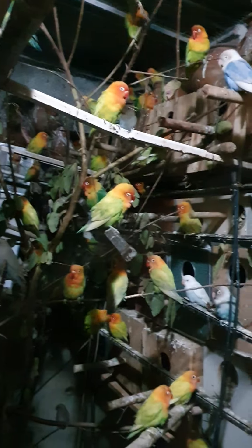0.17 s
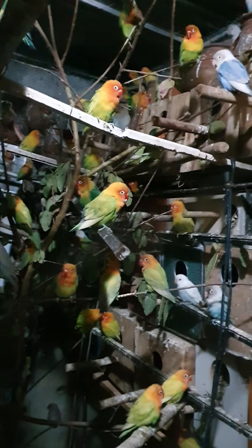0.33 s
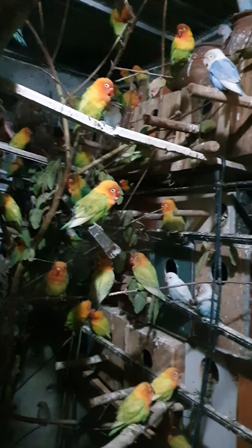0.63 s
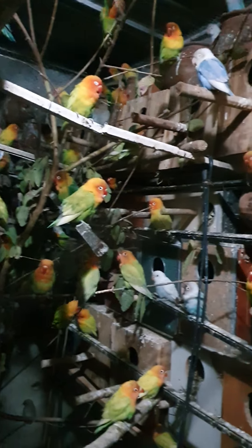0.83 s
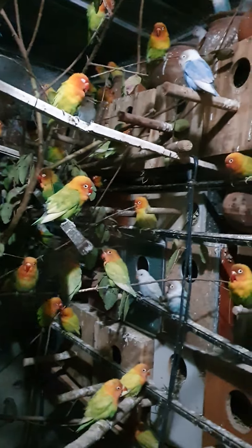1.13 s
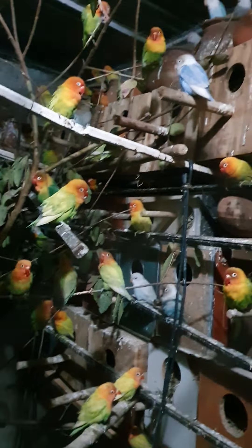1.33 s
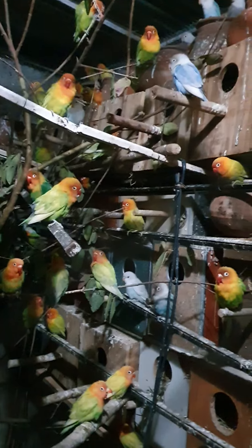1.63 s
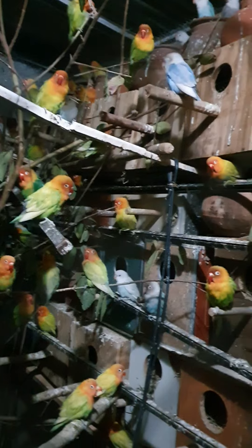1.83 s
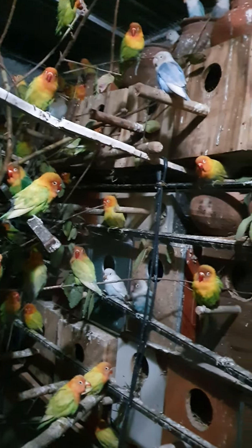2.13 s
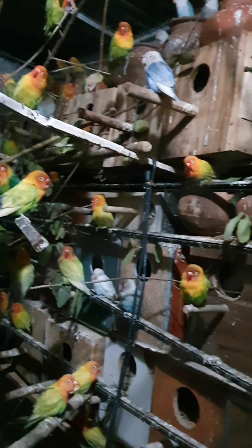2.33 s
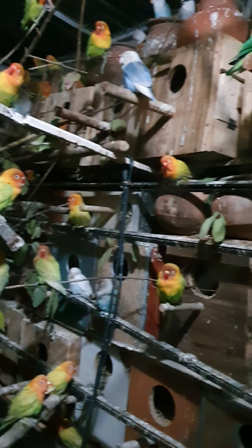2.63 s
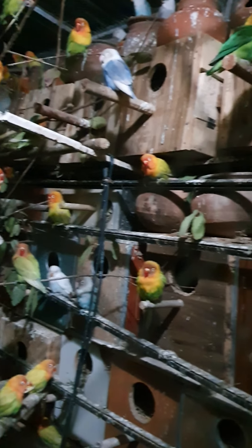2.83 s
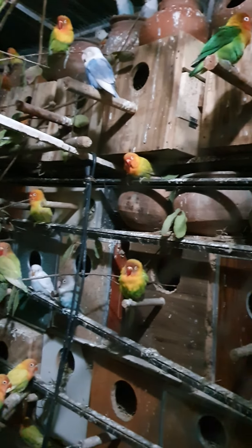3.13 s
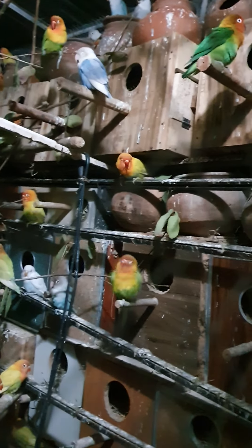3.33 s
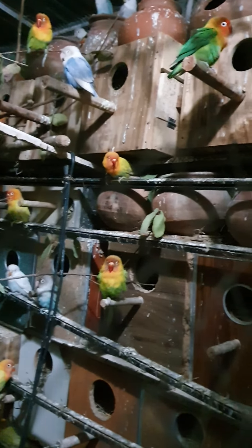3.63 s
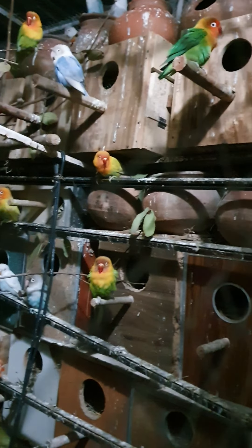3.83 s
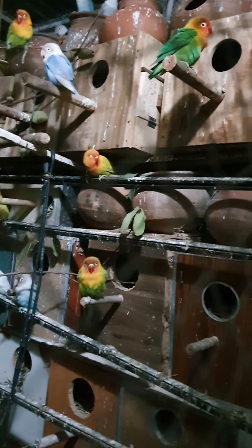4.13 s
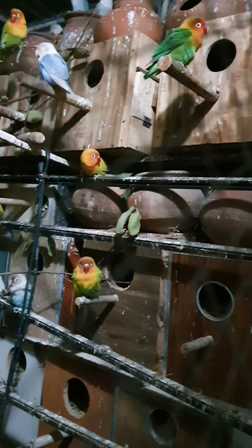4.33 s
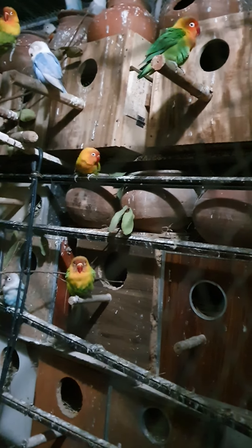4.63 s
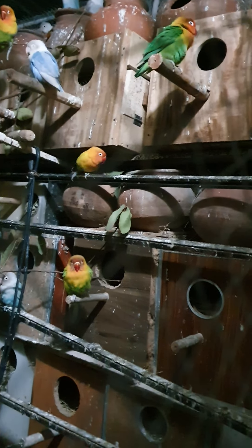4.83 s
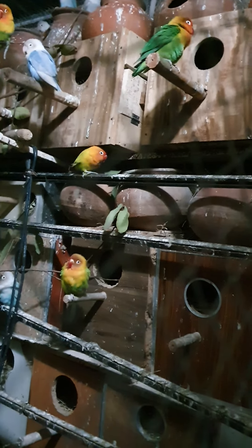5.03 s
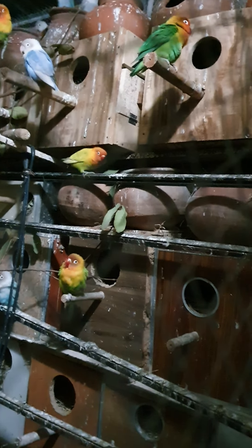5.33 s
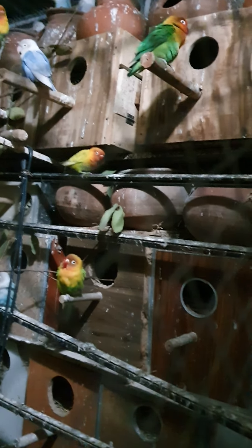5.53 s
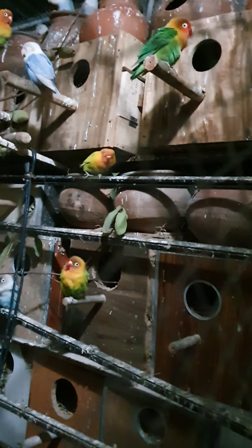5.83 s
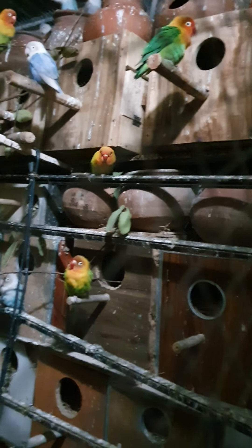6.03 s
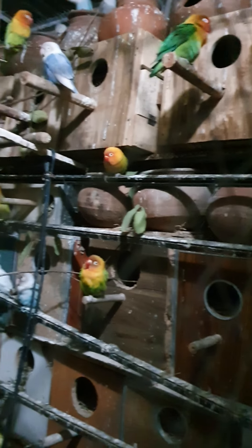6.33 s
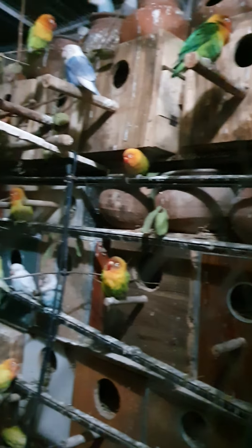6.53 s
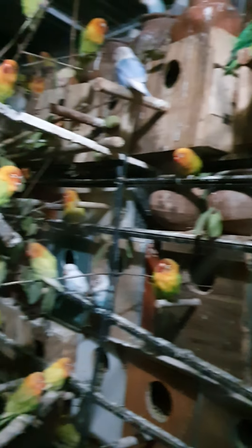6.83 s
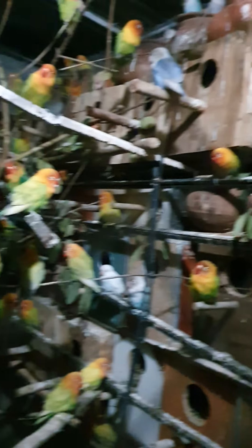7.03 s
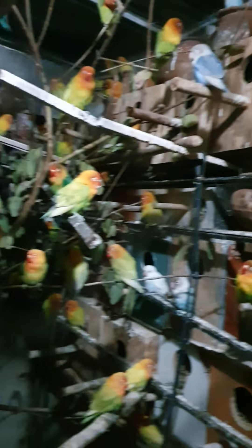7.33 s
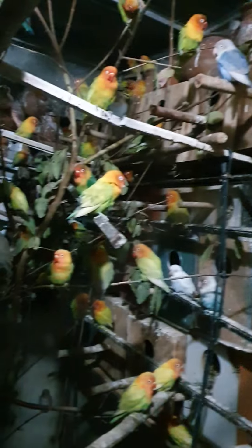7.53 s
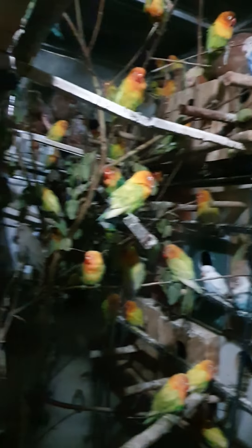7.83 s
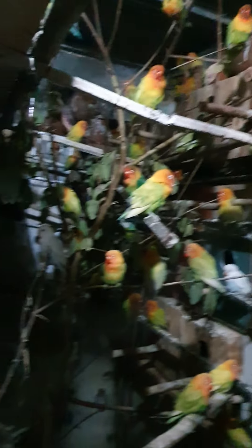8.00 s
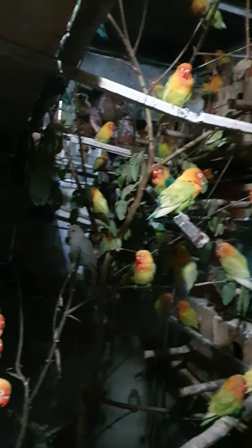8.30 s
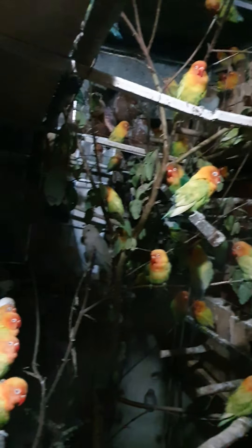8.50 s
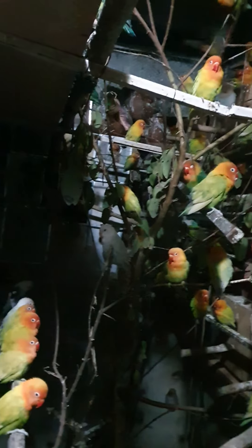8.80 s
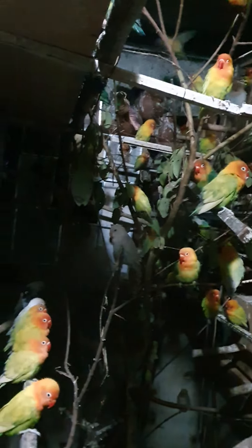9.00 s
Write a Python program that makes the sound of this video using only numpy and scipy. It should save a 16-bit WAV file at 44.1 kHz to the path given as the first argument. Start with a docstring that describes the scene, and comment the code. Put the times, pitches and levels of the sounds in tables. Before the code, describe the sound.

In a roofed aviary with wooden nest boxes, a low wavering hum and faint rumble run throughout. A small tick on wood comes at once, with distant twitter. A soft warble sounds at 0.7 s, a faint clear tone sets in near 0.9 and fades, and chirps gather around 1.1. From 1.3 to 2.5 s a near lovebird rattles off shrill staccato chips, loudest around 1.6, then about twelve a second, with short low notes between. It thins out: taps and a bright peep at 3.1-3.4, a quick warble at 4.1, chirps to 4.6, quiet around 5, then renewed far twitter at 5.6. A hoarse screech bursts out at 6.2, and three sharp calls follow from 6.6 to 6.8. Dull shuffling and a soft air rush fill 7-8 s with faint whistles, a soft bump lands at 8.8, and small chirps close at 9. Echoes are short.

```python
"""A low wavering hum and a tick on wood come first, then far twitter and the near lovebirds of a roofed aviary.
They warble, chirp and rattle off shrill staccato chips; later come a screech and three sharp calls.
Each voice is a gliding tone with overtones that turns hoarse when it is pushed. Box fronts and roof answer
briefly as copies and echo tails. Filtered noise makes the rumble, bumps, dull shuffling and soft rush beneath;
a faint clear tone sets in early and fades."""
import sys
import numpy as np
from scipy import signal
from scipy.fft import rfft, irfft, next_fast_len
from scipy.io import wavfile
from scipy.ndimage import map_coordinates

SR = 44100
rng = np.random.default_rng(int(sys.argv[2]) if len(sys.argv) > 2 else 0)


def master(y):
    """Save y as 16-bit WAV."""
    cut = np.clip(np.atleast_2d(y).T, -1, 1)
    pcm = np.round(cut * 32767)  # scale
    wavfile.write(sys.argv[1], SR, pcm.astype(np.int16))


N = 403956

# strength of the rumble over time, before its gain: (time_s, level_db)
RUMBLE_LEVEL = [(0.0, -61.5), (1.12, -57), (3.75, -62), (5.15, -60), (6.38, -58.5), (6.89, -53.5),
                (7.14, -57), (9.16, -57.5)]


def amp(db):
    """Decibels to gain."""
    return 10 ** (np.asarray(db) / 20)


def unit(x):
    """Scale to rms 1."""
    return x / np.sqrt(np.mean(x ** 2) + 1e-20)


def along(points, hz):
    """Read a curve of (frequency, value) points on a log frequency axis."""
    f, v = np.transpose(points)
    return np.interp(np.log(hz + 1), np.log(f + 1), v)


def curves(rows, t=None):
    """One value per sample for each column after the time."""
    if t is None:
        t = np.arange(N) / SR
    s, *cols = np.transpose(rows)
    return [np.interp(t, s, c) for c in cols]


def swells(rows, order=2):
    """Gain of rounded swells, each (middle_s, length_s, level_db); a higher order gives flatter tops."""
    t = np.arange(N) / SR
    return sum(amp(db) * np.exp(-np.abs(2 * (t - s) / length) ** order) for s, length, db in rows)


def wobble(rate, size):
    """A smooth random curve through `rate` random points a second."""
    points = rng.standard_normal(int(size * rate / SR) + 4)
    return map_coordinates(points, [np.arange(size) * rate / SR])


def filtered(x, response):
    """Multiply the spectrum of x by a response that depends on frequency."""
    m = next_fast_len(N + SR // 2)
    return irfft(rfft(x, m) * response(np.fft.rfftfreq(m, 1 / SR)), m)[..., :N]


def bandpass(x, edges_hz, order):
    """Keep the part of x between two frequencies."""
    return signal.sosfilt(signal.butter(order, edges_hz, 'band', fs=SR, output='sos'), x)


def noise(colour):
    """Coloured stereo noise of rms 1; a shared and an opposed part set how alike the sides are."""
    # likeness of left and right, 1 = same: (frequency_hz, likeness)
    likeness = [(60, 0.56), (150, 0.11), (300, 0.67), (600, -0.2), (1200, -0.037), (4000, -0.02)]

    def response(hz):
        turn = np.arccos(np.clip(along(likeness, hz), -1, 1)) / 2
        return amp(along(colour, hz)) * [np.cos(turn), np.sin(turn)]

    mid, side = filtered(rng.standard_normal((2, N)), response)
    return unit(np.array([mid + side, mid - side]))


def tone(hz, waver):
    """A sine of rms 1 whose pitch wavers at random."""
    return np.sqrt(2) * np.sin(2 * np.pi * np.cumsum(hz * (1 + waver * wobble(10, N))) / SR)


def add(track, s, sound):
    """Mix a stereo sound into the track at time s."""
    part = track[:, max(round(s * SR), 0):][:, :sound.shape[1]]
    part += sound[:, :part.shape[1]]


def tail(decay):
    """A stereo echo tail of noise in which each frequency dies at its own speed."""
    hz, t, z = signal.stft(rng.standard_normal((2, SR // 3)), SR, nperseg=256)
    t60 = np.maximum(along(decay, hz), .01)[:, None]
    echo = signal.istft(z * amp(-60 * t / t60), SR, nperseg=256)[1]
    return echo / np.linalg.norm(echo[0])


def placed(sound, pan_db, boxes_db, roof_db, gap=.002, walls_db=-9, reach=.016, count=5):
    """A sound from a perch: the direct path, copies off box fronts, their scatter and the roof."""
    # time for an echo to fall 60 dB, off the boxes and off the roof: (frequency_hz, decay_s)
    box_decay = [(1500, 0.18), (5000, 0.074), (10000, 0.079), (15000, 0.045)]
    roof_decay = [(1500, .36), (5000, .27), (10000, .2), (15000, .12)]
    echoes = amp(boxes_db) * tail(box_decay) + amp(roof_db) * tail(roof_decay)
    paths = np.pad(echoes, ((0, 0), (int(gap * SR) + 4, 0)))
    # the direct sound reaches the left side three samples earlier
    paths[[0, 1], [0, 3]] += 1
    # flat box fronts return distinct copies, so one glide is heard as several strands
    delay = gap + reach * rng.random((2, count))  # seconds
    paths[[[0], [1]], (delay * SR).astype(int)] += amp(walls_db) * np.exp(-delay / reach)
    heard = signal.fftconvolve(sound[None], paths, axes=1)
    # echoes leave the energy of each side unchanged; panning comes last, positive to the left
    heard *= np.linalg.norm(sound) / np.linalg.norm(heard, axis=1, keepdims=True)
    return unit(amp([[pan_db / 2], [-pan_db / 2]])) * heard


def syrinx(hz, treble_db, rough, jitter=0.1, flutter_db=5, doubling=0.794, rasp_rad=0.78, tilt=1.8,
           split_hz=7300):
    """A tone with overtones; roughness shakes pitch and level, doubles the period and adds rasp."""
    # how throat and open beak colour the overtones: (frequency_hz, gain_db)
    beak_colour = [(900, 25), (1500, 1), (1900, -9), (2600, 1), (3500, -4), (4600, 13.5), (5800, 8.5),
                   (7500, -7), (9500, -0.5), (11000, -4.5), (13000, -1.5), (15500, -12)]
    size = len(hz)
    rough = np.clip(rough, 0, 1)
    phase = 2 * np.pi * np.cumsum(hz * (1 + jitter * rough * wobble(650, size))) / SR
    k = np.arange(2, 19)[:, None] / 2  # multiples of the pitch: 1, 1.5, 2 ... 9
    partial_hz = k * hz
    # lines halfway between the harmonics grow as the voice is pushed
    weight = np.where(k % 1, doubling * rough ** 1.9, 1) * k ** -tilt
    weight = weight * amp(along(beak_colour, partial_hz)) * (partial_hz < SR / 2.5)

    def share(w):
        return w / np.sqrt(np.sum(w ** 2, axis=0) + 1e-12)

    # set the treble level against the rest
    high = (1 + np.tanh((partial_hz - split_hz) / 400)) / 2
    weight = share(weight * (1 - high)) + amp(treble_db) * share(weight * high)
    rasp = rasp_rad * rough ** 2 * wobble(3200, size)
    voice = np.sqrt(2) * np.sum(weight * np.sin(k * (phase + rasp)), axis=0)
    return voice * unit(amp(flutter_db * rough * wobble(600, size)))


def radiated(note, pitch_hz, top_hz, below=0.71, order=3):
    """The beak sheds nothing far below the lowest pitch given, and little of the highest treble."""
    return bandpass(note, [below * np.min(pitch_hz), top_hz], order)


def gate(t, length, attack, release):
    """Opens at zero and closes around the end of a note; all times in seconds."""
    opening = np.sin(np.pi / 2 * np.clip(t / attack, 0, 1))
    closing = np.sin(np.pi / 2 * np.clip((length - t) / release + .5, 0, 1)) ** 2
    return opening * closing


def hum(hum_hz=75, line_db=-2.0, noise_db=2):
    """A low hum: a wavering sine in a band of deep noise, rising and falling together."""
    # level before the two gains: (time_s, level_db)
    hum_level = [(0.0, -51.5), (1.45, -48), (2.04, -55), (2.45, -45), (3.06, -52.5), (3.72, -53),
                 (5.05, -50), (5.31, -53.5), (6.3, -51.5), (6.94, -48), (7.3, -53), (8.04, -46),
                 (8.16, -54), (8.47, -50.5), (8.75, -51), (9.16, -50)]
    # (frequency_hz, gain_db)
    hum_colour = [(13, -38), (22, -21.5), (54, 1), (70, -0.5), (86, 2.5), (140, -22), (180, -45.5),
                  (310, -120)]
    parts = amp(noise_db) * noise(hum_colour) + amp(line_db) * tone(hum_hz, .045)
    return amp(curves(hum_level)[0]) * parts


def rumble(gain_db=4):
    """Low noise that swells and sinks slowly."""
    # (frequency_hz, gain_db)
    rumble_colour = [(65, -36), (110, -3), (178, -5), (274, -13.5), (306, -14.5), (404, -20.5), (480, -19),
                     (620, -48), (1060, -120)]
    return amp(curves(RUMBLE_LEVEL)[0]) * amp(gain_db) * noise(rumble_colour)


def bumps(gain_db=1):
    """Soft low bumps: short swells of deep noise."""
    # level before the gain: (middle_s, length_s, level_db)
    bump_list = [(.28, 0.071, -48), (.95, 0.085, -46), (2.47, 0.15, -48), (6.36, 0.071, -48.5),
                 (6.92, 0.151, -42.5), (7.99, 0.2, -51.5), (8.77, 0.14, -37), (8.83, 0.034, -29.5)]
    # (frequency_hz, gain_db)
    bump_colour = [(15, -32.5), (45, -5.5), (75, -0.5), (120, -5.5), (170, -7), (260, -23), (450, -35.5),
                   (900, -81.5)]
    return swells(bump_list) * amp(gain_db) * noise(bump_colour)


def air_rush(gain_db=2):
    """A soft rush of air: coloured noise of changing strength."""
    # level before the gain: (time_s, level_db)
    rush_level = [(0.0, -79), (1.33, -61.5), (1.73, -67), (2.37, -64.5), (2.93, -76), (3.21, -73),
                  (3.44, -57.5), (3.7, -69.5), (4.82, -70), (5.18, -61), (5.41, -60), (6.25, -69),
                  (6.4, -58.5), (6.71, -65.5), (7.5, -54), (8.47, -61), (8.9, -59), (9.16, -57)]
    # (frequency_hz, gain_db)
    rush_colour = [(800, -13), (1200, -6), (1550, 0.5), (2000, 2.5), (2500, -10.5), (3500, -37),
                   (6000, -36)]
    return amp(curves(rush_level)[0]) * amp(gain_db) * noise(rush_colour)


def shuffling(gain_db=2.5, stir_db=-6):
    """Dull scuffs of unsteady noise, over a faint stir that follows the rumble."""
    # level before the gain: (middle_s, length_s, level_db)
    scuff_list = [(.3, 0.146, -65), (.73, 0.13, -59), (1.22, 0.18, -59), (5.1, 0.227, -64),
                  (5.76, .1, -60.5), (6.03, 0.089, -60), (6.38, 0.17, -59.5), (6.99, 0.2, -45.5),
                  (7.27, 0.055, -57.5), (7.43, .12, -49), (7.65, .08, -55.5), (7.77, .12, -51.5),
                  (7.92, .12, -48), (8.06, 0.0775, -51.5), (8.62, 0.081, -57), (8.82, 0.153, -53.5)]
    # (frequency_hz, gain_db)
    shuffle_colour = [(250, -32), (430, -9.5), (550, -0.5), (660, -0.5), (950, -6.5), (1300, -12.5),
                      (1700, -14.5), (2600, -39.5)]
    stir = amp(stir_db) * amp(curves(RUMBLE_LEVEL)[0])
    level = np.hypot(amp(gain_db) * swells(scuff_list), stir)
    return level * amp(2.3 * wobble(60, N)) * noise(shuffle_colour)


def background():
    """The low sounds lean to the right; the shuffling and the rush lean to the left."""
    low = hum() + rumble() + bumps()
    return low * amp([[-2.3], [1.7]]) + (shuffling() + air_rush()) * amp([[1], [-1]])


def drone(drone_hz=305, start_s=.87, attack_s=0.034, level_db=-58, fade_db_per_s=6):
    """A faint clear tone that sets in and fades by a steady number of decibels a second."""
    age = np.maximum(np.arange(N) / SR - start_s, 0)
    return np.minimum(age / attack_s, 1) * amp(level_db - fade_db_per_s * age) * tone(drone_hz, 0.006)


def taps(click_db=-9, knock_db=-7, click_t60=0.01, knock_t60=0.013):
    """Claws and beaks on wood: each a dry noise tick with a small, duller knock."""
    # both gains come on top; knock_level_db is relative to the tap: (start_s, level_db, knock_level_db)
    tap_list = [(0.055, -41.5, -21), (3.14, -41, -15), (3.339, -30.5, -33), (4.175, -31, -11),
                (4.638, -44, 2), (6.884, -44, 9), (7.207, -36, -30), (7.957, -50, 14.5)]
    track, t = np.zeros((2, N)), np.arange(SR // 20) / SR

    def burst(band_hz):
        return unit(bandpass(rng.standard_normal(len(t)), band_hz, 2))

    for s, db, wood_db in tap_list:
        tick = amp(click_db) * burst([2000, 9000]) * amp(-60 * t / click_t60)
        knock = amp(knock_db + wood_db) * burst([400, 1600]) * amp(-60 * t / knock_t60)
        add(track, s, placed(amp(db) * (tick + knock), 0, boxes_db=-29, roof_db=-14.0))
    return track


def flock(twitter_db=-2.0, hiss_db=-9.0, quiet_db=-86, lull_db=-78):
    """Far birds: one echoing, wandering voice blurs into bouts of faint twitter over a fine hiss."""
    # bouts at the back of the aviary, level before the gains: (middle_s, length_s, level_db)
    bout_list = [(.22, 0.42, -68), (.92, 0.58, -61.5), (1.85, 1.5, -58), (2.68, .14, -65),
                 (3.33, 0.29, -58.5), (5.15, 0.31, -73.5), (5.64, .32, -53), (6.4, 0.21, -52.5),
                 (6.72, 0.56, -62), (7.31, 0.54, -56), (7.75, 0.323, -67), (8.3, 0.35, -60.5),
                 (8.76, 0.22, -64), (9.04, .17, -53.5)]
    # (frequency_hz, gain_db)
    hiss_colour = [(1500, -25), (2600, -1), (3800, -4), (5500, -16.5), (7200, -21.5), (9500, -13.5),
                   (12500, -15.5), (16000, -30)]
    voice = syrinx(3550 * np.exp(.15 * wobble(70, N)), treble_db=-12, rough=.4)
    voice = voice * amp(5.5 * wobble(34, N))
    twitter = unit(placed(voice, 0, boxes_db=8.5, roof_db=-4)[:, :N])
    level = amp(lull_db) + swells(bout_list, order=6)
    hiss = (level * amp(hiss_db) + amp(quiet_db)) * noise(hiss_colour)
    return level * amp(twitter_db) * twitter + hiss


def sharp_call(s, length, top_hz, db):
    """A sharp call climbs hoarsely to a clear top; all share this shape."""
    # (share_of_length, pitch_ratio, level_db, treble_db, roughness_0_to_1)
    sharp_shape = [(0, .56, -11, -6, 0.6), (.27, .72, -7.5, -1, .42), (0.469, .82, -9, -5.5, 1),
                   (.64, 1, 2.5, -12, .25), (1, 0.95, -16, -0.5, 0.2)]
    return [(s + share * length, ratio * top_hz, db + level_db, treble_db, rough)
            for share, ratio, level_db, treble_db, rough in sharp_shape]


def phrases(gain_db=1.0):
    """Longer calls: pitch, level, treble and roughness wind from point to point."""
    # points along each call, level before the gain: (time_s, pitch_hz, level_db, treble_db, roughness_0_to_1)
    soft_warble = [(0.73, 3080, -46, -10, 0.56), (0.752, 4800, -61, 2, 0.1),
                   (0.766, 2620, -36.5, -15, 0.02), (0.785, 2450, -43, -11, 0.07),
                   (0.797, 4750, -51, -16, 0.46), (0.826, 3900, -51.5, 1.5, 0),
                   (0.836, 2365, -37.5, -41, 0.1), (0.86, 2820, -68.5, -7, 0.54),
                   (0.885, 2420, -40, -16, 0.4)]
    warble = [(4.07, 4263, -31, -17, .25), (4.077, 5194, -43.5, -17, 0.493), (4.083, 2584, -45, -13, 0.95),
              (4.104, 3066, -38, -11.5, 0.37), (4.113, 5634, -38, -26, 0.09),
              (4.134, 6000, -55, -22, 0.046), (4.141, 3850, -46, -15, 0.088),
              (4.156, 2434, -44.5, -12, .12), (4.174, 3550, -44, -20, 0.14), (4.182, 5300, -50, -33, .08),
              (4.196, 4926, -35.5, -18, .06), (4.214, 5398, -36.5, -17, 0.049)]
    screech = [(6.219, 3290, -33, -7, 0.6), (6.227, 5500, -27.5, -5.5, 0.4), (6.24, 6434, -28.5, -19, 0.45),
               (6.257, 6306, -32.5, 0, 0.23), (6.267, 3100, -20, -12, 0.38),
               (6.277, 2979, -26, -13.5, 0.062), (6.286, 4280, -18.5, -10.5, 0.3),
               (6.315, 4555, -24.5, -18.5, 0.28), (6.33, 4744, -27.5, -6.5, 1),
               (6.345, 4446, -24, -26, 0.38)]
    peep = [(3.353, 4506, -36, -9, 0.27), (3.358, 5289, -27.5, -10.5, 0.25), (3.363, 5880, -25, -21, 0.125),
            (3.37, 5599, -36, -1, 0.058), (3.382, 5504, -34, -4, 0.054)]
    falling_whistle = [(7.295, 3750, -54, -6, .2), (7.345, 3450, -50, -9, .08), (7.36, 2100, -49, -18, .06),
                       (7.385, 1500, -50, -22, .05), (7.41, 1405, -46, -25, .04),
                       (7.47, 1390, -50, -16, .06)]
    rising_whistle = [(8.334, 2750, -55.5, -2.5, .4), (8.35, 2480, -53.5, 1.5, 0.35),
                      (8.365, 3145, -41, -10, 0.26), (8.39, 3790, -57.5, 1.5, 0.3),
                      (8.415, 4740, -48, -3, .3)]
    # level before the shape and the gain: (start_s, length_s, top_hz, level_db, left_over_right_db)
    sharp_list = [(6.578, .033, 4680, -28.5, -0.3), (6.694, .04, 4670, -23, -0.5),
                  (6.805, .041, 4890, -21, 0)]
    # each call with its left over right in dB
    calls = [(soft_warble, 3.8), (warble, -1.7), (screech, -0.5), (peep, 0.9),
             (falling_whistle, -1.3), (rising_whistle, 6.9)]
    calls += [(sharp_call(*call), pan_db) for *call, pan_db in sharp_list]
    track = np.zeros((2, N))
    for rows, pan_db in calls:
        start, length = rows[0][0], rows[-1][0] - rows[0][0]
        t = np.arange(int((length + .004) * SR)) / SR
        hz, db, treble_db, rough = curves(rows, start + t)
        note = amp(db + gain_db) * syrinx(hz, treble_db, rough)
        note = note * gate(t, length, attack=0.00256, release=0.0073)
        note = radiated(note, hz, top_hz=13504)
        add(track, start, placed(note, pan_db, boxes_db=-0.5, roof_db=-22.5))
    return track


def chirps(gain_db=1.13):
    """Short notes whose pitch rises, arches or falls in the shape of their kind."""
    # pitch is that of the middle, level before the gain:
    # (start_s, length_s, pitch_hz, level_db, treble_db, left_over_right_db)
    rising = [(1.054, .047, 4471, -35.5, -6.5, 0.5), (1.168, 0.028, 4270, -33, -12.5, 6),
              (4.348, .024, 3950, -49, -3, 4.5), (4.453, .031, 3540, -39, -11.5, 3),
              (4.576, .025, 4405, -29.5, -7.5, 1), (5.517, 0.044, 2950, -50, -7, 9),
              (7.127, 0.014, 5650, -42, -16.5, 0), (8.996, .045, 4400, -45.5, -13, 7)]
    low_falling = [(1.697, 0.013, 1797, -43.5, 0.5, 4.5), (1.797, 0.016, 1935, -35, -1.5, 8.5),
                   (1.994, 0.011, 1700, -49.5, -3, 9), (2.088, 0.0098, 1716, -46, -15, 2),
                   (2.163, 0.014, 1890, -40.5, -19, 10), (5.787, .016, 1780, -38.5, -8, 0),
                   (5.863, 0.0097, 1743, -34.5, -4.5, 1), (5.937, 0.01, 1750, -34.5, -3, 1)]
    arched = [(.893, 0.021, 4250, -52.5, -12, 2.5), (.928, 0.056, 2873, -43.5, -10.5, 6),
              (1.072, 0.027, 3255, -42, -8, 5), (3.183, 0.071, 3870, -52.5, -17, 6),
              (4.469, 0.011, 5000, -40, -16, -2), (5.015, 0.0211, 4535, -65, -10.5, 1),
              (5.207, 0.02, 4650, -60.5, -10, -5), (5.483, 0.0363, 2280, -48, -10, 5),
              (5.59, 0.044, 2410, -42, -6.5, 1.5), (6.392, 0.039, 3840, -43, -14, 2),
              (6.473, .04, 4565, -45, -10, 1), (8.049, 0.027, 4603, -39.5, -1, 4),
              (8.138, 0.021, 4500, -44, -1, 2)]
    hoarse = [(1.184, 0.011, 4193, -26, -4.5, 1), (2.062, .004, 2610, -33, -11.5, 3),
              (2.384, 0.00834, 2406, -40, -8.5, 3), (3.689, .034, 2987, -45.5, -3, 2),
              (4.453, 0.018, 3013, -46.5, -7, -3), (6.369, 0.011, 3580, -35, -11, 1),
              (7.201, .04, 3920, -56, -9, 3), (7.497, .019, 4980, -56, -0.5, .5)]
    clear_sagging = [(1.112, 0.029, 4000, -46.5, -21, -9), (2.445, 0.037, 4443, -35, -5.5, 1),
                     (3.395, 0.056, 3460, -50, -34, 5), (5.647, 0.0336, 3530, -42, -32, 2),
                     (7.14, 0.083, 3704, -51.5, -19, 3), (7.592, .024, 2786, -56.5, -11, 4),
                     (9.074, .04, 3780, -49, -19, 3)]
    # (notes, start pitch ratio, end pitch ratio, roughness 0 to 1)
    kinds = [(rising, .82, 1.07, .42), (low_falling, 1.13, .87, .3), (arched, .95, .93, .38),
             (hoarse, .9, .94, .82), (clear_sagging, 1.035, .97, .12)]
    track = np.zeros((2, N))
    for notes, start, end, rough in kinds:
        shape = np.polyfit([0, .5, 1], [start, 1, end], 2)
        for s, length, pitch_hz, db, treble_db, pan_db in notes:
            t = np.arange(int((length + 0.0035) * SR)) / SR
            hz = pitch_hz * np.polyval(shape, t / t[-1])
            voice = syrinx(hz * (1 + 0.014 * wobble(150, len(t))), treble_db, rough)
            note = amp(db + gain_db) * voice * gate(t, length, attack=0.0041, release=0.0021)
            note = radiated(note, hz, top_hz=13500)
            # faint birds sit farther away, so more of their sound is echo
            far_db = -.3 * (db + 40)
            add(track, s, placed(note, pan_db, boxes_db=far_db - 3.5, roof_db=far_db - 20))
    return track


def chips(scoop_s=0.0026, gain_db=1.5, swell_db=4):
    """Staccato chips: each snaps open and glides, mostly upward, to its top pitch in milliseconds."""
    # level before gain and swell: (start_s, length_s, start_hz, top_hz, level_db, left_over_right_db)
    chip_list = [(1.268, 0.0094, 6230, 5080, -24, 3.5), (1.345, 0.0069, 6020, 5240, -22, 9.5),
                 (1.358, .007, 3250, 4730, -34, 3.5), (1.42, .0025, 3202, 4270, -24, 6.5),
                 (1.433, 0.0098, 4430, 5150, -31.5, 1.5), (1.483, 0.0032, 3207, 4375, -24.5, 4),
                 (1.514, 0.0073, 4198, 4935, -37, -2.5), (1.547, .004, 5220, 5704, -15.5, 7),
                 (1.617, .004, 5390, 5390, -12.5, 6.5), (1.69, 0.0041, 4840, 5450, -15, -2.5),
                 (1.771, 0.0074, 3730, 5180, -27.5, 0.5), (1.847, .008, 3890, 5020, -21, .5),
                 (1.926, 0.0075, 3660, 5020, -22, 5), (2.007, .006, 3590, 5020, -22, 5),
                 (2.087, 0.0057, 3600, 4880, -21, 9), (2.167, 0.0079, 3410, 4800, -19.5, 5),
                 (2.253, 0.0059, 3510, 4800, -16, 5), (2.333, 0.0077, 3370, 5060, -19.5, 4.5),
                 (2.418, 0.0068, 3330, 4950, -20, 3.5), (2.504, 0.0049, 3290, 4810, -19, 3.5)]
    track = np.zeros((2, N))
    for s, length, start_hz, top_hz, db, pan_db in chip_list:
        t = np.arange(int((length + 0.0048) * SR)) / SR
        unsettled = np.exp(-t / scoop_s)
        hz = top_hz + (start_hz - top_hz) * unsettled
        # a deeper upward scoop is brighter; a wider glide either way is hoarser, most of all at its start
        octaves = np.log2(top_hz / start_hz)
        treble_db = -9.5 + 13 * max(octaves, 0) - 4 * unsettled
        rough = (0.12 + 0.39 * abs(octaves)) * (0.74 + 2.3 * unsettled)
        swell = swell_db * (np.sin(np.pi * np.clip(t / length, 0, 1)) - .5)
        note = amp(db + gain_db + swell) * syrinx(hz, treble_db, rough)
        note = note * gate(t, length, attack=.0006, release=.003)
        note = radiated(note, start_hz, top_hz=16500)
        add(track, s, placed(note, pan_db, boxes_db=-8.0, roof_db=-28.5))
    return track


def scene():
    """The aviary, the far birds and the near birds together."""
    return background() + drone() + taps() + flock() + phrases() + chirps() + chips()


def record(dry, limit_hz=16100):
    """The microphone dulls the deepest bass and top treble; nothing above the limit is kept."""
    # (frequency_hz, gain_db)
    mic_response = [(20, -9), (45, 0.5), (13300, 1), (14500, -14), (16000, -10.5)]
    return filtered(dry, lambda hz: amp(along(mic_response, hz)) * (hz < limit_hz))


dry = scene()
out = record(dry)
master(out)
```